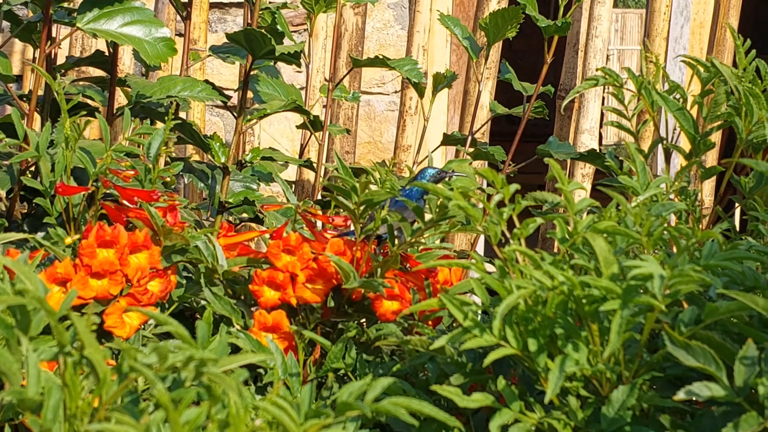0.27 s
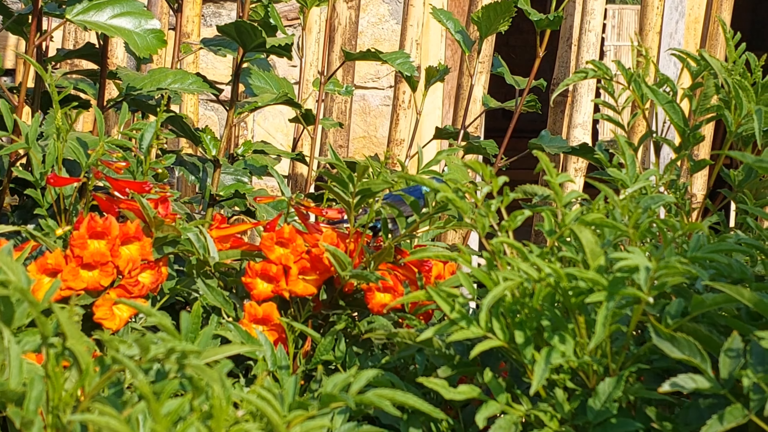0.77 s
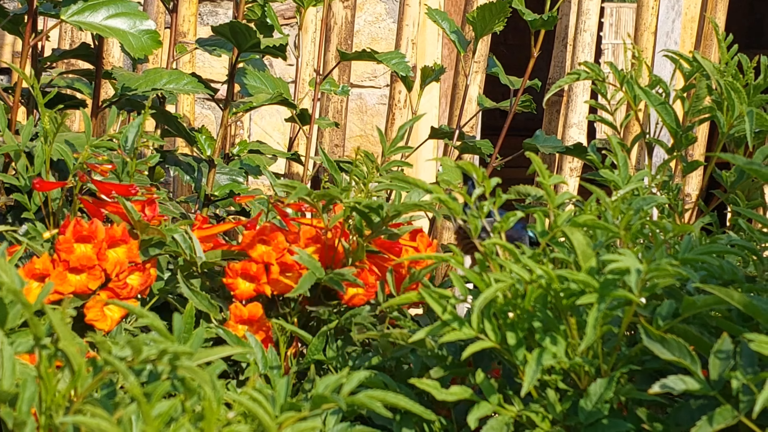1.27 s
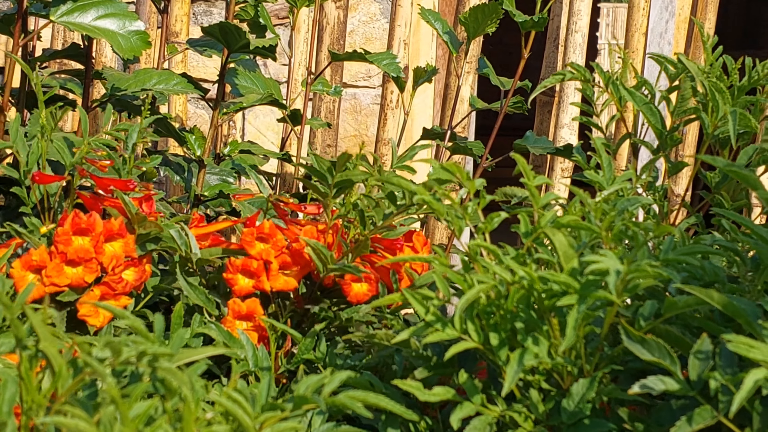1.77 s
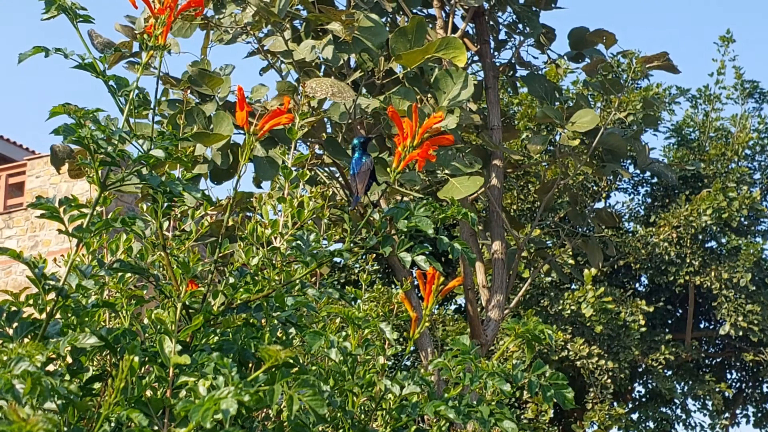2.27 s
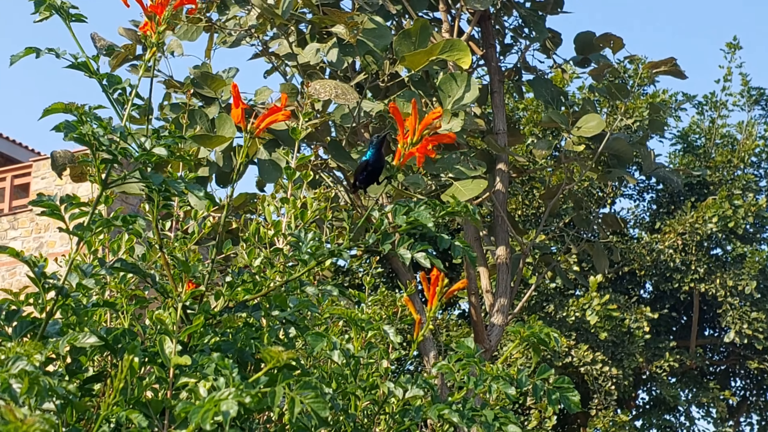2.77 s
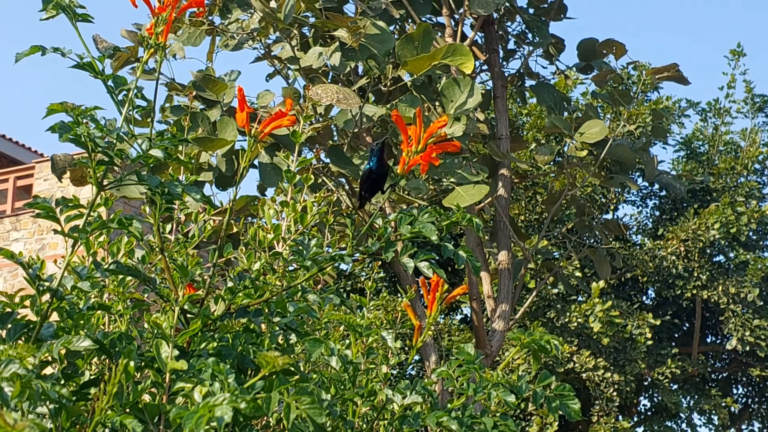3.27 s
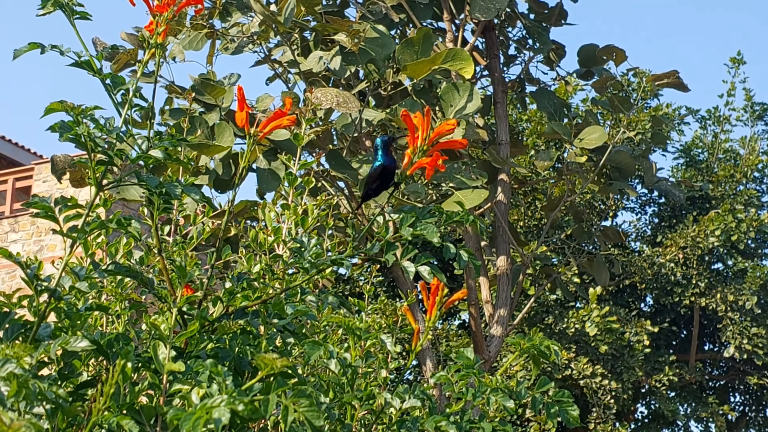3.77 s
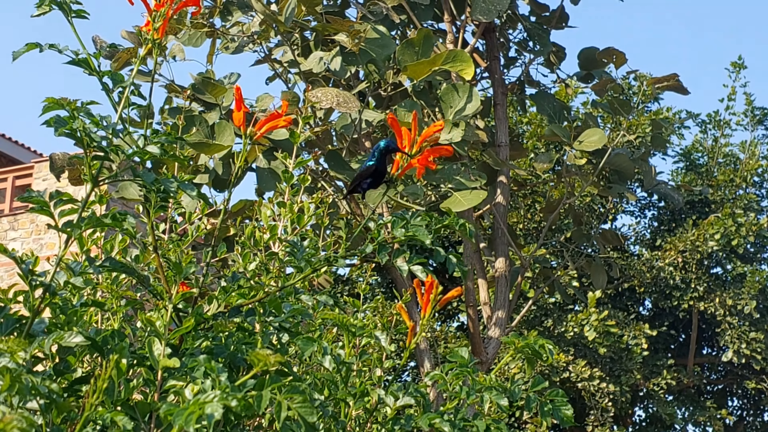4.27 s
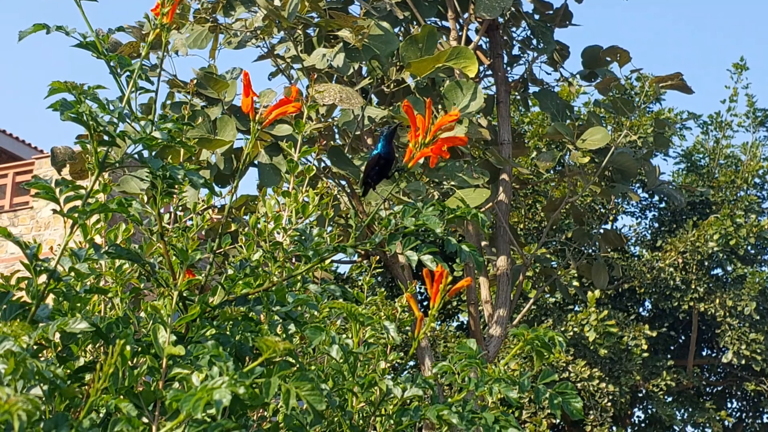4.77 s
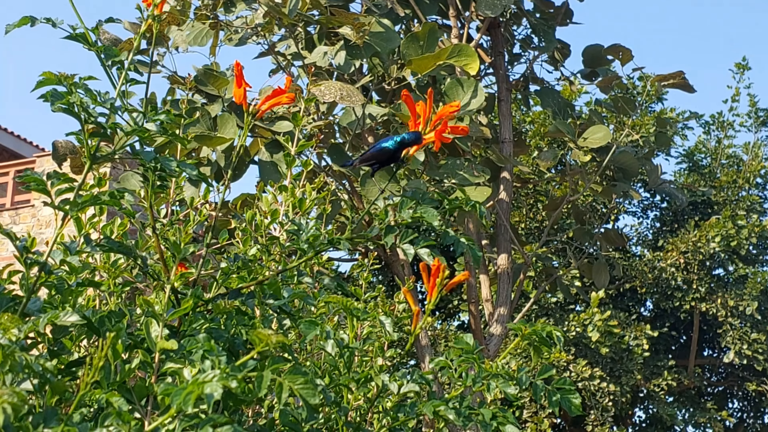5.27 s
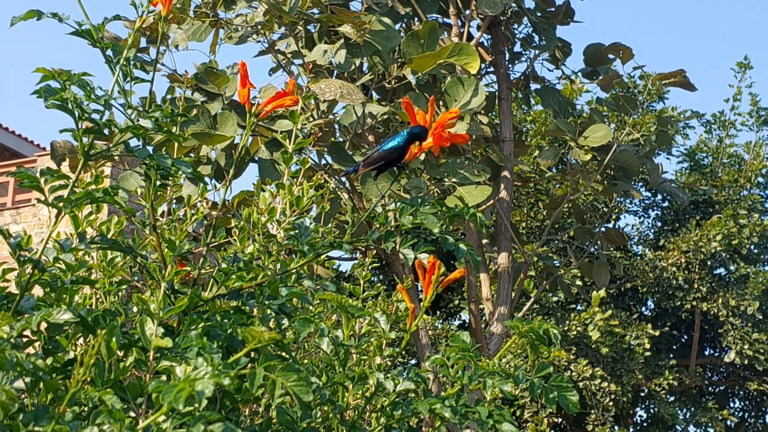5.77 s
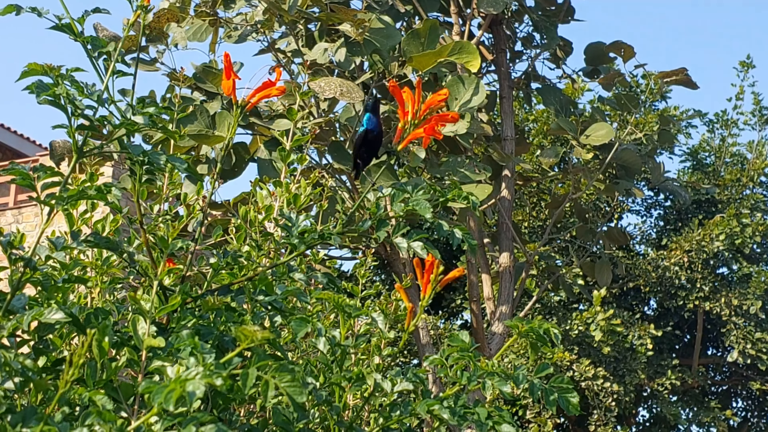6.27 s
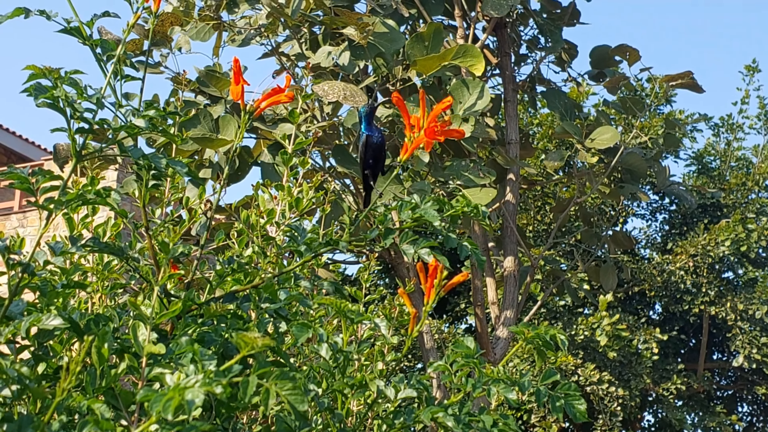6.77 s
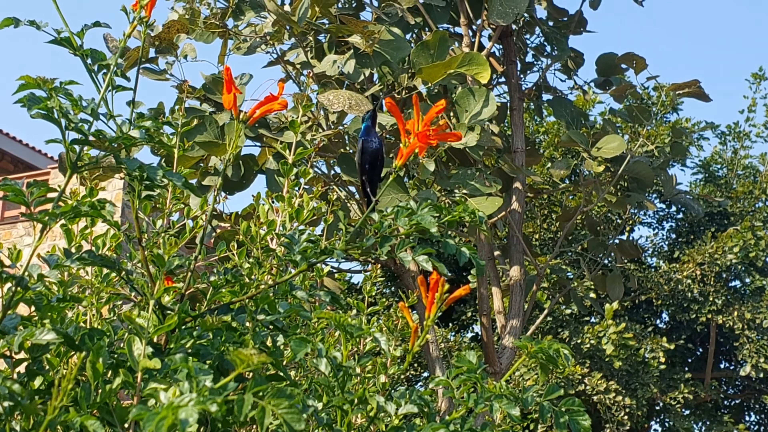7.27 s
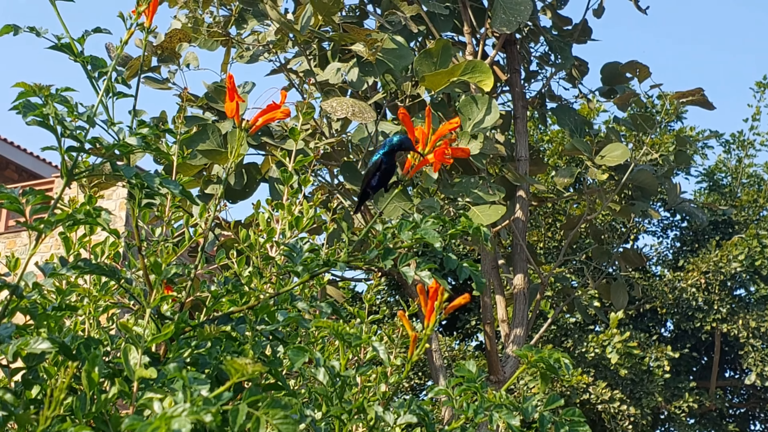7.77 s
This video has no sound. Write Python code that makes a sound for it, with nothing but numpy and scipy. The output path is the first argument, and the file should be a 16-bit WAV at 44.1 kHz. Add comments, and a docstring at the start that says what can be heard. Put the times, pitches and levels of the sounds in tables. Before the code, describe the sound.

Outdoors in a leafy garden, a quiet start of air hiss and faint rustle gives way to a small bird's sharp falling chirps: four in quick, even succession, then three widely spaced ones. Very thin rising whistles slip between them. Another bird warbles softly far away over blurred chatter. Light wind rumbles and thumps on the stereo microphone, leaves tick, and distant traffic washes faintly.

```python
"""A sunbird in a garden hedge gives sharp falling chirps and thin rising whistles, scattered by leaves and walls.
Its voice is a near sine with a gliding pitch, followed by separate echoes and by dense fading noise echoes.
Another songbird warbles far off, over the blurred chatter of still more distant birds, all made of sine notes.
Light wind rumbles and thumps on the microphone (shaped noise and push-pull pulses), and leaves rustle and tick
(crackling noise, short bursts) over the outdoors (shaped noise: an even hiss, and traffic that swells and sinks)."""
import sys
import numpy as np
from scipy import signal
from scipy.fft import rfft, irfft, next_fast_len
from scipy.io import wavfile
from scipy.ndimage import uniform_filter1d

SR = 44100
rng = np.random.default_rng(int(sys.argv[2]) if len(sys.argv) > 2 else 0)


def unload_audio(sound):
    """Save the sound as a 16-bit wav file, at the path given as the first command line argument."""
    columns = np.transpose(np.atleast_2d(sound))
    # keep every value between -1 and 1, then stretch to whole-number steps
    steps = np.round(np.clip(columns, -1, 1) * 32767)
    wavfile.write(sys.argv[1], SR, steps.astype(np.int16))


N = 353770
T = np.arange(N) / SR  # time [s]
SIZE = next_fast_len(N)  # length of the spectra that colour the sound
HZ = np.maximum(np.arange(SIZE // 2 + 1) * SR / SIZE, 1)


def sunbird():
    """Chirps and rising whistles, roughened by near echoes, smeared by the hedge and later by the garden walls."""
    # falling chirps: (start [s], hold [s], fall [s], top [Hz], middle [Hz], bottom [Hz],
    # scoop into the held note [Hz], level [dB], held note [dB], accent at the turn [dB],
    # swell through the fall [dB], closing note [dB], direct share [dB], near echoes [dB],
    # left minus right [dB], lead of the left port [s])
    chirps = [(1.76, 0.02, 0.059, 4850, 3676, 2250, 3, -40, -20, 7.5, 7, -7, -7, -6, -0.5, 0.002),
              (2.08, 0.022, 0.067, 4840, 3680, 2300, -100, -40, -16, 7, 4.5, -9.5, -3, -4.5, -0.5, 0.0019),
              (2.387, .026, 0.064, 5010, 3740, 2300, -150, -39.5, -13.5, 2.5, 1, -8.5, -4.5, -3, -0.5, 0),
              (2.673, 0.019, 0.07, 4704, 3620, 2150, 3, -40.5, -17, 11.5, 6, -8, -4, -7, -1, 0.0074),
              (4.953, .019, .06, 4997, 3640, 2300, -2, -43.5, -11, 1.5, 5, -2, -0.5, -6, -1, -.0007),
              (5.808, .02, .066, 5050, 3660, 2100, -450, -36, -11.5, -1, -4, -11, 2, -6, -1, -0.00011),
              (7.376, .027, 0.063, 5214, 3564, 2150, 87, -36, -13, -5, 2.5, -13, 1, -8, 0.5, 0.0015)]
    # rising whistles: (start [s], length [s], first pitch [Hz], middle pitch [Hz], last pitch [Hz],
    # level [dB], swell [dB], pitch waver [share of the pitch], left minus right [dB])
    whistles = [(3.183, 0.042, 4250, 4550, 5900, -63, 2, .045, -6),
                (3.222, .118, 4400, 5650, 6620, -51, 1.5, 0.023, -6.5),
                (3.525, .15, 4100, 4950, 5950, -64.5, 12, 0.024, -2),
                (2.525, 0.054, 5450, 6300, 7050, -59, -7, 0.028, -8),
                (1.51, .07, 4700, 4700, 5100, -67.5, 0, .04, -3),
                (7.24, 0.098, 3900, 4900, 6000, -73.5, 3, .04, 0)]
    whistle_direct_db, whistle_echoes_db, whistle_lead_s = -2.5, -6, 0.000418
    voice, direct = np.zeros((2, 2, N))  # voice feeds the dense echoes; direct is heard as it is

    def sing(s, note, direct_db, echoes_db):
        add(voice, s, note)
        add(direct, s, undb(direct_db) * note)
        add(direct, s, undb(echoes_db) * branches(note))

    for row in chirps:
        s, *shape, db, held_db, accent_db, swell_db, closing_db, direct_db, echoes_db, pan_db, lead_s = row
        note = undb(db) * chirp(*shape, held_db, accent_db, swell_db, closing_db)
        sing(s, ports(note, pan_db, lead_s), direct_db, echoes_db)
    for s, length, first_hz, middle_hz, last_hz, db, swell_db, waver, pan_db in whistles:
        t = T[:int(length * SR)]
        # a smooth pitch curve through the three given pitches
        curve = np.polyfit([0, .5, 1], [first_hz, middle_hz, last_hz], 2)
        hz = np.polyval(curve, t / length)
        note_db = db + swell_db * (t / length - .5)
        note = whistle(t, hz, note_db, waver, flutter_db=2.5, edge_s=0.091 * length)
        sing(s, ports(note, pan_db, whistle_lead_s), whistle_direct_db, whistle_echoes_db)
    hedge = scatter(voice, t60=0.098, wet_db=-1.5, build_s=0.00029)
    walls = scatter(voice, t60=0.37, wet_db=-3.0, build_s=0.014)
    return direct + hedge + walls


def chirp(hold, fall, top_hz, middle_hz, bottom_hz, scoop_hz, held_db, accent_db, swell_db, closing_db):
    """A high note slides onto its pitch and holds, falls steeply but lingers halfway, then a low note arches up."""
    # loudness through a fall: (progress [share of the fall], level [dB])
    fall_loudness = [(0, -10), (.14, -10), (.29, -1.5), (.53, -7), (.76, -9.5), (.9, -8), (1, -22.5)]
    accent_s, closing_s, closing_hz = 0.0094, 0.06, 2640
    middle_slope = 0.453  # below 1, the pitch lingers halfway down
    t = T[:int((hold + fall + closing_s) * SR)]
    u = (t - hold) / fall  # 0 to 1 through the fall
    v = np.clip(1 - 2 * u, -1, 1)  # 1 at the top, 0 in the middle, -1 at the bottom
    after = np.maximum(t - hold - fall, 0) / closing_s  # 0 to 1 through the closing note

    span_hz = np.where(v > 0, top_hz - middle_hz, middle_hz - bottom_hz)
    hz = middle_hz + span_hz * v * (middle_slope + (1 - middle_slope) * v ** 2)
    arch_hz = closing_hz * (1 + 0.0199 * rng.standard_normal()) - bottom_hz
    hz = hz + arch_hz * np.sin(2.2 * after)
    hz = hz + scoop_hz * np.maximum(1 - t / hold, 0) ** 2

    db = np.interp(u, *np.transpose(fall_loudness)) + swell_db * (u - .5)
    db = np.where(u < 0, held_db + 6 * (t / hold - .5), db)
    db = db + accent_db * np.exp(-((t - hold) / accent_s) ** 2)
    closing_level_db = closing_db + np.interp(after, [0, .25, .65, 1], [-7, -7, -5.5, -7.5])
    db = np.where(u > 1, closing_level_db, db)

    waver = np.interp(u, [0, .3, 1, 1.3], [.005, .014, .018, .018])
    # the overtone is strongest on the high note and fades as the pitch drops
    third = undb(-25 - 20 * (top_hz - hz) / (top_hz - middle_hz))
    return whistle(t, hz, uniform_filter1d(db, 200), waver, flutter_db=1.5, third=third)


def whistle(t, hz, db, waver, flutter_db, edge_s=0.0012, third=0):
    """The syrinx (a bird's voice organ): a near sine of trembling pitch and strength, perhaps with a third harmonic."""
    hz = uniform_filter1d(hz, 128) * (1 + waver * walk(600, len(t)))
    edges = np.clip(np.minimum(t, t[-1] - t) / edge_s, 0, 1)  # fade in and out
    phase = 2 * np.pi * np.cumsum(hz) / SR
    tone = np.sin(phase) + third * np.sin(3 * phase)
    return np.sqrt(2) * tone * edges * undb(db + flutter_db * walk(253.4, len(t)))


def branches(note, count=5, first_s=.003, last_s=.028):
    """A few separate echoes from nearby trunks and ground, new for each note; they beat against its gliding pitch."""
    out = np.zeros((2, N))
    for port in range(2):
        for k, (late, size) in enumerate(rng.random((count, 2))):
            delay_s = first_s + (last_s - first_s) * (k + late) / count
            add(out[port], delay_s, (.5 + size) * note[port] / np.sqrt(count))
    return out


def scatter(x, t60, wet_db, build_s, patchy_db=-0.85):
    """Dense echoes from foliage and walls: noise that builds up, then fades by 60 dB in t60 seconds, on each side."""
    t = T[:SR]
    clumps = undb(patchy_db * np.array([walk(225, SR), walk(213.6, SR)]))
    fade = np.exp(-np.log(1000) * t / t60)
    tail = clumps * rng.standard_normal((2, SR)) * fade * (1 - np.exp(-t / build_s))
    tail /= np.sqrt(np.sum(tail ** 2, axis=1, keepdims=True))  # same energy on both sides
    return undb(wet_db) * signal.fftconvolve(x, tail, axes=1)[:, :N]


def far_bird(level_db=-3, lead_s=-0.0004):
    """Short, clear, curving notes from far off, each trailed by faint echoes."""
    # notes, with levels ahead of the overall level_db:
    # (start [s], length [s], first pitch [Hz], last pitch [Hz], upward arch [Hz], level [dB])
    warble = [(1.197, 0.03, 2720, 2540, 80, -62), (1.295, .025, 2600, 2380, 50, -69),
              (1.353, .06, 2540, 2330, 18, -61), (1.465, 0.052, 2680, 2120, -260, -63),
              (1.51, 0.041, 2773, 2450, 40, -52.5), (1.58, .03, 1844, 1720, 30, -70),
              (1.612, 0.023, 2610, 2330, 0, -59), (1.637, 0.037, 2790, 2550, 100, -52),
              (1.721, 0.033, 1940, 1670, 0, -63), (1.772, 0.024, 2160, 2200, 30, -56),
              (2.029, 0.057, 2680, 1710, 4, -62), (2.086, .037, 2050, 1950, 60, -58),
              (2.261, 0.033, 2480, 2560, 58, -52), (2.374, .038, 2550, 2370, 106, -65),
              (2.867, 0.045, 2554, 2640, 25, -62), (3.41, .022, 2540, 2610, 28, -55.5),
              (3.592, 0.055, 2065, 2680, 128, -61), (3.706, .047, 2690, 1920, 182, -57),
              (3.819, 0.065, 2100, 3040, 68, -60), (3.922, .042, 2590, 1790, 44, -55),
              (4.011, 0.042, 2640, 2500, 40, -56.5), (4.068, 0.039, 2350, 2010, 88, -54),
              (4.103, .06, 2200, 2590, -19, -52.5), (4.177, 0.039, 2470, 2500, -2, -55),
              (4.216, 0.051, 3010, 2610, -72, -56), (4.356, 0.035, 2610, 2600, 30, -60.5),
              (4.483, 0.033, 2350, 2380, 150, -62.5), (4.717, 0.034, 1940, 1870, -30, -61),
              (4.775, 0.044, 2000, 3200, -3, -57.5), (5.139, 0.022, 2700, 2380, 50, -54.5),
              (5.2, 0.044, 2410, 1880, -130, -65), (5.298, 0.053, 2370, 2190, -21, -60.5),
              (5.613, 0.071, 2620, 2654, 54.5, -59.5), (5.727, 0.069, 1917, 2380, 208, -53),
              (5.918, .045, 2400, 2420, 150, -54), (5.981, 0.029, 2470, 1800, 95, -47.5),
              (6.168, 0.11, 2320, 2580, 35, -70.5), (6.419, .06, 2230, 2380, 60, -70),
              (6.496, .075, 2390, 2090, -46, -68), (6.719, 0.038, 2170, 2240, -120, -63.5),
              (6.77, 0.085, 2470, 2760, 40, -73), (6.921, 0.057, 2230, 2100, 84, -67),
              (7.002, 0.057, 2250, 2014, -60, -63), (7.06, 0.087, 2126, 2200, -28, -65.5),
              (7.245, 0.051, 2106, 2370, 41, -65), (7.332, .058, 2480, 2830, 0, -66.5),
              (7.645, .045, 2320, 2180, 98, -62.5), (7.79, 0.047, 2450, 2530, 30, -64)]
    song = np.zeros((2, N))
    for s, length, first_hz, last_hz, arch_hz, db in warble:
        t = T[:int(length * SR)]
        glide_hz = first_hz + (last_hz - first_hz) * t / length
        hz = glide_hz + arch_hz * np.sin(np.pi * t / length)
        note = whistle(t, hz, db, waver=.02, flutter_db=3, edge_s=.009)
        add(song, s, ports(note, 0, lead_s))
    return undb(level_db) * (song + scatter(song, t60=.27, wet_db=-3, build_s=.004))


def far_flock(count=400, centre_hz=2300, spread_hz=230, from_s=1.1, note_s=.04, slur_per_s=4, spread_db=3.0):
    """Still further off, more birds blur into a faint chatter of short slurred notes that comes in bouts."""
    # bouts of chatter: (start [s], length [s], level [dB])
    bouts = [(1.35, 0.64, -67.5), (1.95, 0.66, -65.5), (3.55, 0.68, -66), (4.33, 0.81, -69.5),
             (5.1, 0.24, -69), (5.7, .3, -61.5), (6.39, 0.12, -74), (6.71, .14, -73), (6.93, 0.15, -70),
             (7.52, 0.15, -61), (7.76, 0.17, -69.5)]
    murmur_db = -74  # steady level under the bouts
    effort = np.sqrt(undb(murmur_db) ** 2 + swells(bouts, attack_s=0.02, release_s=0.03))
    song = np.zeros((1, N))
    t = T[:int(note_s * SR)]
    step_s = (T[-1] - note_s - from_s) / count
    for k, (late, pitch, slur, size) in enumerate(rng.standard_normal((count, 4))):
        note_hz = centre_hz + spread_hz * np.clip(pitch, -2, 2)
        hz = note_hz * (1 + slur_per_s * slur * (t - t.mean()))
        note = whistle(t, hz, spread_db * min(size, 1), waver=.03, flutter_db=3, edge_s=.008)
        add(song, from_s + (k + np.tanh(late)) * step_s, note[None])
    return scatter(song * effort, t60=.25, wet_db=0, build_s=.003)


def wind(gust_db=-44, eddy_db=-15, steepness=0.97):
    """Turbulence on the microphone ports: a deep rumble, finer eddies that swell with it, and sudden buffets."""
    # gusts: (start [s], length [s], level at the left port [dB], level at the right port [dB])
    gusts = [(.38, 0.068, -51, -51), (1.915, 0.21, -40, -65), (2.19, 0.082, -28, -62),
             (2.39, 0.063, -50, -31.5), (2.48, 0.11, -53, -43), (3.13, 0.14, -38, -64),
             (3.33, 0.27, -46.5, -68), (3.56, 0.16, -43.5, -32), (3.76, 0.057, -62, -37),
             (3.91, 0.16, -45.5, -35), (4.05, 0.25, -48, -32.5), (4.22, 0.16, -56, -37),
             (4.42, 0.094, -48, -45.5), (4.71, 0.085, -63, -42.5), (5.14, 0.037, -34, -68),
             (5.28, 0.1, -43, -70), (5.73, 0.11, -39.5, -63), (5.89, 0.088, -42.5, -43),
             (6.3, 0.12, -45, -39), (6.8, 0.12, -47.5, -67), (7.16, 0.1, -46, -60), (7.43, 0.041, -43, -54),
             (7.56, 0.14, -64, -33.5)]
    # the breeze between gusts: (time [s], level at the left port [dB], level at the right port [dB])
    breeze = [(0, -74, -61.5), (1.5, -59, -62), (3.0, -57.5, -65.5), (3.6, -58, -41.5), (5.4, -49.5, -57),
              (6.4, -51, -51), (8.02, -49.5, -52.5)]
    # colour of the deep rumble ahead of its filter: (frequency [Hz], relative level per Hz [dB])
    rumble = [(18, -25), (26, -21), (38, -3), (50, 1.5), (64, 4), (80, -5.5), (120, -10), (180, -28.5),
              (280, -17), (400, -34)]
    # buffets, each side varied at random: (time [s], strength [dB], centre [Hz])
    buffets = [(1.946, -44, 110), (2.101, -31.5, 120), (2.209, -20, 126), (2.247, -21.5, 103),
               (2.272, -23, 100), (2.432, -34, 86), (3.616, -33.5, 146), (3.642, -27.5, 107),
               (3.783, -28, 104), (3.928, -34.5, 132), (4.088, -34.5, 136), (4.262, -34, 137),
               (4.379, -36, 105), (5.169, -39, 111), (5.78, -35.5, 100), (7.662, -34.5, 105)]
    attack_s, release_s = 0.016, 0.028
    left, right = (undb(db) ** 2 + swells(gusts, attack_s, release_s, port)
                   for port, db in enumerate(curves(breeze)))
    db = 10 * np.log10((left + right) / 2)
    pan_db = 10 * np.log10(left / right)

    deep = undb(db + 2.23 * walk(25)) * noise(rumble, likeness=0.15)
    deep = signal.sosfilt(signal.butter(2, [24, 150], "bandpass", fs=SR, output="sos"), deep)
    fine = noise([(80, 0.5), (135, 1.5), (250, -13.0), (380, -22.0), (700, -36)], likeness=0.84)
    # at the level gust_db the eddies lie eddy_db from it; steepness is their dB per dB of wind
    fine_db = gust_db + eddy_db + steepness * (db - gust_db) + 3.8 * walk(50)
    out = deep + fine * undb(fine_db)

    t = T[:SR // 20] - T[SR // 40]
    for s, strength_db, hz in buffets:
        # an eddy crossing a port pushes, then pulls
        u = 2 * np.pi * hz * t
        push = -u * np.exp((1 - u ** 2) / 2)
        add(out, s + t[0], undb(strength_db + rng.standard_normal((2, 1))) * push)
    return out * sides(pan_db)


def leaves(rustle_db=-1.0, pan_db=-6, crackle_hz=300, crackle_db=1.5, spread_db=4.5, grain_s=0.0007, shift_db=3.0):
    """Leaves brush in a hiss of tiny crackles; large and small ones stir on their own, so the colour keeps shifting."""
    # light stirring of the whole hedge, ahead of rustle_db: (time [s], level [dB])
    stir = [(0, -66.5), (2.7, -63), (3.05, -82), (3.5, -65), (4.9, -62), (5.4, -66.5), (6.2, -75),
            (7.2, -89), (8.02, -78)]
    # sprays of leaves brushing past each other, ahead of rustle_db: (start [s], length [s], level [dB])
    brushes = [(.07, 0.028, -64), (.62, 0.3, -65), (1.21, 0.17, -65), (1.5, 0.025, -58.5),
               (1.88, 0.2, -59.5), (2.19, 0.096, -52.5), (2.38, 0.14, -63.5), (3.27, 0.13, -61.5),
               (3.66, 0.039, -60), (3.92, 0.036, -57), (4.21, 0.24, -59.5), (4.61, 0.24, -65),
               (5.65, 0.36, -61.5), (6.05, 0.042, -58.5), (6.75, 0.083, -64.5), (7.43, 0.36, -67),
               (7.89, 0.053, -59)]
    # colour of the rustle: (frequency [Hz], relative level per Hz [dB])
    leaf_colour = [(1500, -3), (3000, -3.5), (5500, 0.5), (8200, -9), (10500, -4.5), (13500, -8),
                   (16000, -18)]
    # where large to small leaves sound: one list of frequencies [Hz]
    bands_hz = [2900, 6340, 10600, 14000]
    stir_db, = curves(stir)
    stir_power = undb(stir_db + 2 * walk(14)) ** 2
    db = 10 * np.log10(stir_power + swells(brushes, attack_s=0.0059, release_s=0.029))
    spectrum, out = rfft(noise(leaf_colour), SIZE), 0
    for share in np.eye(len(bands_hz)):
        # crackle_hz contacts a second on average: many faint ones, a few stronger
        strength_db = crackle_db + spread_db * np.minimum(rng.exponential(size=N), 3)
        contacts = (rng.random(N) < crackle_hz / SR) * undb(strength_db)
        # each contact's power dies away
        crackle = signal.lfilter([1], [1, -np.exp(-2 / (grain_s * SR))], contacts ** 2)
        hiss = irfft(spectrum * np.interp(HZ, bands_hz, share), SIZE)[:, :N]
        out = out + hiss * np.sqrt((1 + crackle) / 2) * undb(shift_db * walk(45))
    return sides(pan_db) * undb(db + rustle_db + 0.61 * walk(25)) * out


def leaf_ticks(tick_db=-9, tick_s=0.0043, width_hz=2500, snap_db=-9, pan_db=-6):
    """Now and then one leaf flicks against another: a broad snap, brightest around that leaf's own pitch."""
    # single ticks, ahead of tick_db: (time [s], strength [dB], centre [Hz])
    ticks = [(1.8627, -44, 9000), (2.1944, -37, 6000), (2.2244, -44, 11000), (2.2544, -42, 6950),
             (3.34, -40, 11000), (3.6765, -46, 7000), (3.928, -37, 6200), (3.9444, -38, 11000),
             (3.9935, -30, 10700), (4.2238, -36, 7000), (4.7282, -41, 11000), (4.9566, -45, 9000),
             (6.5266, -37.5, 5100), (6.766, -44, 5000), (6.977, -51, 14500), (7.171, -52, 14000),
             (7.289, -47, 6300)]
    out, t = np.zeros((2, N)), T[:SR // 20]
    for s, strength_db, hz in ticks:
        burst = rng.standard_normal((2, len(t))) * np.exp(-t / tick_s)
        ring = signal.lfilter(*signal.iirpeak(hz, hz / width_hz, fs=SR), burst)
        snap = signal.sosfilt(signal.butter(2, 2000, "highpass", fs=SR, output="sos"), burst)
        add(out, s, undb(strength_db + tick_db) * (ring + undb(snap_db) * snap))
    return sides(pan_db) * out


def outdoors(pan_db=-2, traffic_db=-2, lead_s=-.00039):
    """Still-air hiss and the soft wash of distant traffic, arriving a little from the right."""
    # colour of the air hiss: (frequency [Hz], relative level per Hz [dB])
    air_colour = [(25, -8), (45, -1.5), (63, 2.5), (80, -15), (120, -14.5), (204, -15), (445, -27),
                  (970, -23.5), (1400, -25.5), (2700, -23.5), (3300, -26), (5100, -25), (5900, -27.5),
                  (6800, -27), (8400, -35.5), (13200, -32), (15800, -41.5)]
    air_db = -59  # level of the hiss [dB]
    # distant traffic, ahead of traffic_db: (time [s], level [dB])
    traffic = [(0, -74), (1.6, -72.5), (2.2, -64.5), (2.9, -70.5), (3.4, -65), (6, -63.5), (7.2, -67.5),
               (7.7, -60.5)]
    db, = curves(traffic)
    road_colour = [(250, -2.0), (450, -5.5), (700, -3), (1200, -9.5), (2200, -4.5)]  # (Hz, dB per Hz)
    road = noise(road_colour, likeness=0.45, lead_s=lead_s)
    air = noise(air_colour, likeness=0.2, lead_s=lead_s) * undb(air_db + 0.48 * walk(22))
    return sides(pan_db) * air + road * undb(db + traffic_db + 0.96 * walk(8))


def undb(db):
    """Decibels to gain."""
    return 10 ** (np.asarray(db) / 20)


def curves(table):
    """Each column of a table joined by straight lines in time."""
    s, *columns = np.transpose(table)
    return [np.interp(T, s, c) for c in columns]


def sides(pan_db):
    """Left and right gains for a level difference, left minus right, at unchanged average power."""
    gains = undb(np.array([pan_db, -pan_db]).reshape(2, -1) / 2)
    return gains / np.sqrt(np.mean(gains ** 2, axis=0))


def ports(sound, pan_db, lead_s):
    """One sound at two microphone ports: a level difference and a small difference in arrival."""
    t = T[:len(sound)]
    return sides(pan_db) * np.array([sound, np.interp(t - lead_s, t, sound)])


def add(out, s, sound):
    """Mix a sound in from time s."""
    i = int(s * SR)
    out[..., i:i + sound.shape[-1]] += sound[..., :N - i]


def swells(table, attack_s, release_s, column=0):
    """Summed power of events (start, length, levels) that each rise, hold until their length is up and die away."""
    power = np.zeros(N)
    for s, length, *db in table:
        t = T[:int((length + 6 * release_s) * SR)]
        shape = np.minimum(t / attack_s, 1) * np.exp(-np.maximum(t - length, 0) / release_s)
        add(power, s, (undb(db[column]) * shape) ** 2)
    return power


def walk(rate, size=N):
    """Smooth random wander with a spread near 1, heading for about rate new values a second."""
    k = max(int(SR / rate), 1)
    steps = np.repeat(rng.standard_normal(size // k + 1), k)
    return 1.306 * uniform_filter1d(steps, k)[:size]


def noise(spectrum, likeness=0, lead_s=0):
    """Stereo noise of a given colour, rms 1; both sides share the part likeness, lead_s earlier on the left."""
    hz, db = np.transpose(spectrum)
    gain = undb(np.interp(np.log(HZ), np.log(hz), db, left=-120, right=-120))
    white, c = rng.standard_normal((3, N)), np.clip(likeness, 0, 1)
    common = np.array([white[2], np.roll(white[2], round(lead_s * SR))])
    mixed = np.sqrt(1 - c) * white[:2] + np.sqrt(c) * common
    x = irfft(rfft(mixed, SIZE) * gain, SIZE)[:, :N]
    return x / x.std()


def scene():
    """Birds, wind, leaves and background together."""
    return sunbird() + far_bird() + far_flock() + wind() + leaves() + leaf_ticks() + outdoors()


def record(dry):
    """Each microphone port has its own colour, and a steep filter cuts the highest treble."""
    # difference between the ports: (frequency [Hz], left minus right [dB])
    port_colour = [(500, 1.5), (1200, -2), (3400, -1), (5300, 2), (7200, 2), (9500, 3.5), (12500, -2),
                   (14200, -3.5), (16000, -3)]
    top_hz = 15800  # where the treble ends [Hz]
    hz, db = np.transpose(port_colour)
    gains = sides(np.interp(np.log(HZ), np.log(hz), db))
    heard = irfft(rfft(dry, SIZE) * gains, SIZE)[:, :N]
    return signal.sosfilt(signal.ellip(10, .2, 70, top_hz, fs=SR, output="sos"), heard)


dry = scene()
out = record(dry)
unload_audio(out)
```